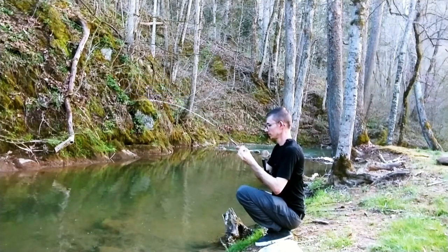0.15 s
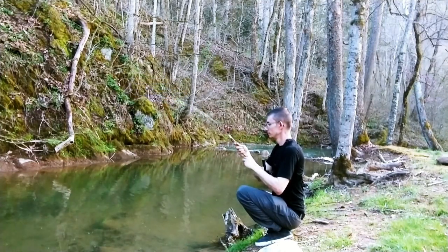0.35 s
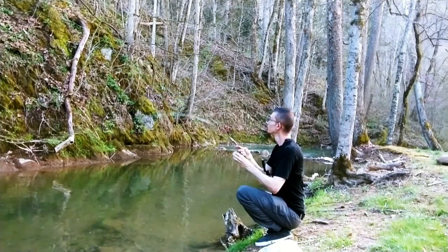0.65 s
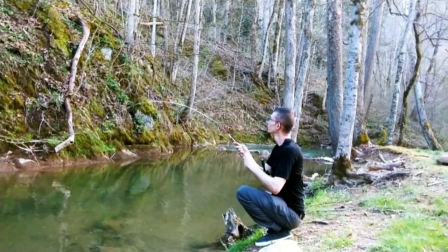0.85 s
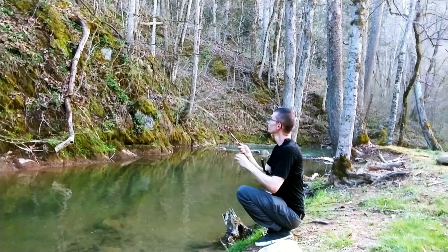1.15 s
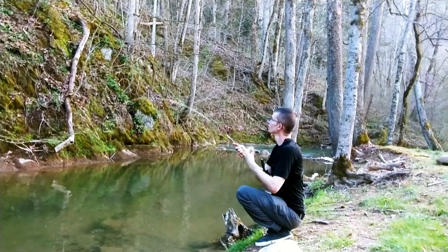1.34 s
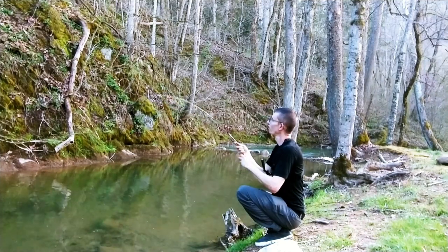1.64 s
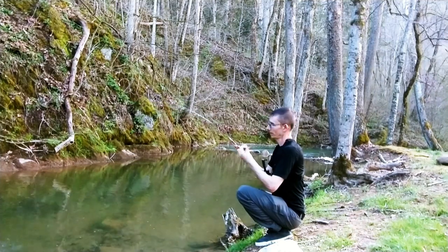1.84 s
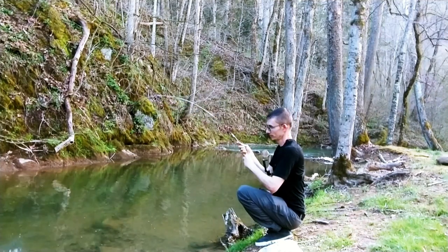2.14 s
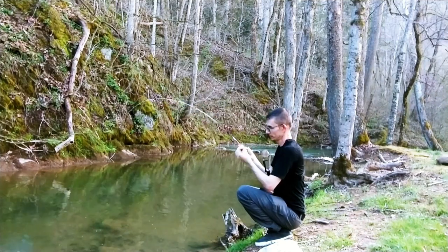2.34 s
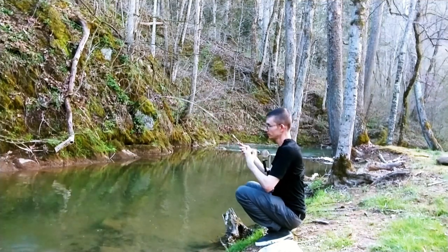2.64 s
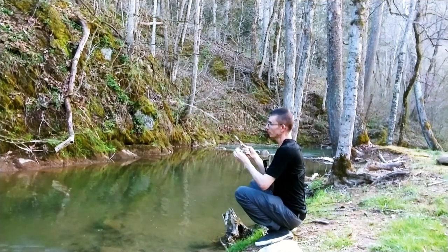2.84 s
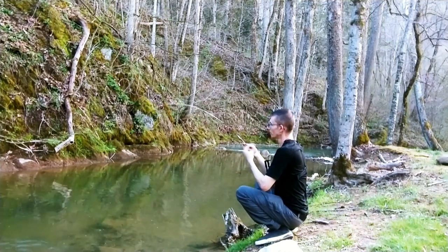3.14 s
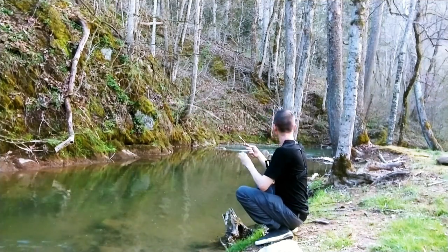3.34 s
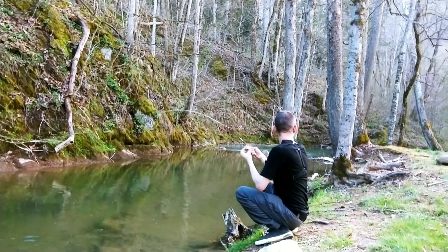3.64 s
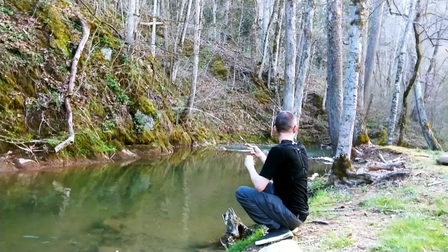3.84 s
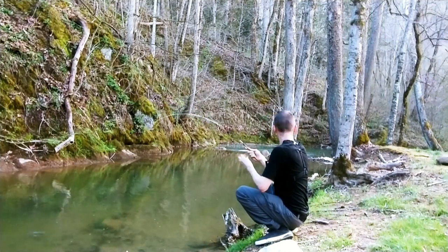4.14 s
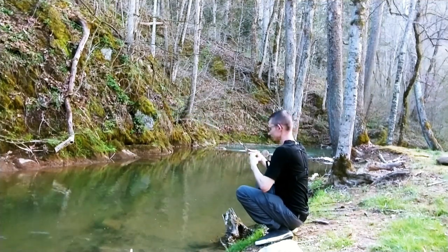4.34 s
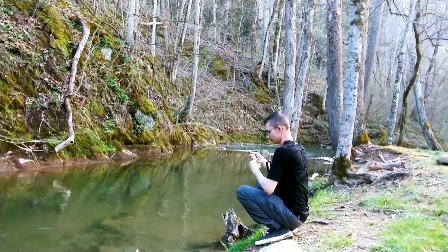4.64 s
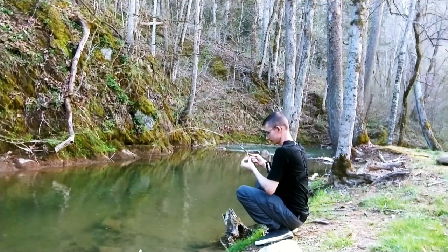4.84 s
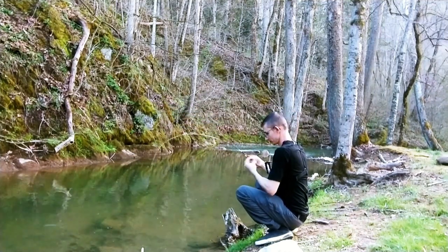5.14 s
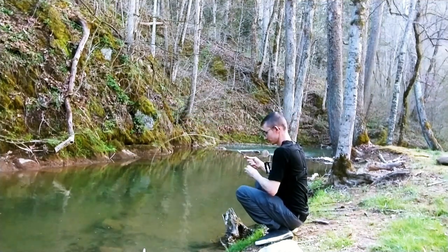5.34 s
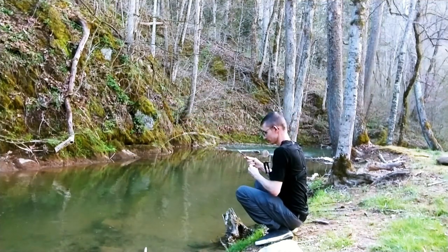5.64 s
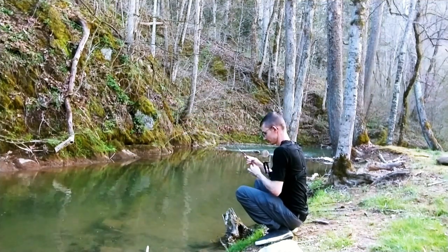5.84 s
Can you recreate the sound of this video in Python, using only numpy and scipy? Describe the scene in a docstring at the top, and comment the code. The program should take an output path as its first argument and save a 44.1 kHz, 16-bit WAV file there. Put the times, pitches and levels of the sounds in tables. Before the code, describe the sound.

Constant bubbling stream hiss outdoors, with soft low rumble and a far rotor-like fluttering beat growing louder and steadier.

```python
"""From the start a creek rushes over a stony riffle in a wooded valley: churned noise, ringing bubbles, brief splashes.
Light air rumbles underneath as low noise, and a low unsteady throb, most likely a far helicopter's rotor,
sounds as harmonics of a slowly sinking beat. Faint dry ticks, puffs of treble noise, come from 1.6 to 2 s.
The throb then grows louder and steadier to the end, with two thin gliding peeps, perhaps a bird, after 5 s.
"""
import sys
import numpy as np
from scipy import signal
from scipy.fft import rfft, irfft, next_fast_len
from scipy.io import wavfile
from scipy.ndimage import uniform_filter1d, map_coordinates

SR = 44100
rng = np.random.default_rng(int(sys.argv[2]) if len(sys.argv) > 2 else 0)


def unload_wav(signal):
    """Save mono or channel-first audio to the path in sys.argv[1] as 16-bit WAV at rate SR, clipped to [-1, 1]."""
    wavfile.write(
        sys.argv[1],
        SR,
        np.round(np.clip(np.atleast_2d(signal).T, -1, 1) * 32767).astype(np.int16),
    )


N = 263718
TIME_S = np.arange(N) / SR


def amp(db):
    """Decibels to gain."""
    return 10 ** (np.asarray(db) / 20)


def unit(x):
    """Scale to rms 1."""
    return x / np.sqrt(np.mean(np.abs(x) ** 2) + 1e-20)


def along(points, hz):
    """Join (frequency, value) points on a log frequency axis."""
    point_hz, value = np.transpose(points)
    return np.interp(np.log(hz + 1), np.log(point_hz + 1), value)


def curve(points):
    """Join (time, value) points into one value per sample."""
    point_s, value = np.transpose(points)
    return np.interp(TIME_S, point_s, value)


def wobble(knots_per_s):
    """Smooth random curve through normal random knots."""
    knots = rng.standard_normal(int(N * knots_per_s / SR) + 4)
    return map_coordinates(knots, [np.arange(N) * knots_per_s / SR])


def filtered(x, response):
    """Multiply the spectrum of x by a response of frequency."""
    m = next_fast_len(N + SR // 2)
    hz = np.fft.rfftfreq(m, 1 / SR)
    return irfft(rfft(x, m) * response(hz), m)[..., :N]


def band(centre_hz, octaves):
    """Stereo noise of rms 1 in a bell around a pitch."""
    noise = rng.standard_normal((2, N))
    return unit(filtered(noise, lambda hz: np.exp(-(np.log2((hz + 1) / centre_hz) / octaves) ** 2)))


def swell(centre_s, length_s):
    """Bell in time, down to 1/e at length_s either side."""
    return np.exp(-((TIME_S - centre_s) / length_s) ** 2)


def placed(x, lean_db):
    """Pan x so that left is louder than right by lean_db."""
    return x * amp([[lean_db / 2], [-lean_db / 2]])


# Spectral shape of the rush, middle and sides: (frequency [Hz], gain [dB])
WATER_MID_GAIN = [(100, 4), (230, 2.5), (305, 2), (370, 0.5), (450, 2.5), (720, -1.6), (1000, 0.5),
                  (1500, 0.5), (2100, -1.37), (3000, -7), (4100, -11), (4800, -11), (8400, -15),
                  (12200, -30)]
WATER_SIDE_GAIN = [(100, -9), (250, -8.5), (700, -8.5), (1000, -3), (1400, -5), (2100, -8.5), (3000, -11),
                   (4100, -14), (4800, -14.5), (8400, -15.5), (10500, -22.5), (12200, -35)]
# Stereo lean of the water: (frequency [Hz], left minus right [dB])
WATER_LEAN = [(200, 1), (450, 0.5), (700, -1), (1000, 0.5), (1400, 2.5), (2200, 0), (3700, -0.5), (4700, 4),
              (5600, -2.5), (6400, 3), (8200, -2.5), (11000, 0)]
FLOW_START_DB, FLOW_SINKS_DB_PER_S = -37.5, 0.245


def creek():
    """Churning water and its bubbles, spread wide by the banks; the rush slowly declines."""
    ringing = bubbles(count=4400, low_hz=399.4, high_hz=4976, cycles=17.0, rise=0.11, spread_db=1.0)
    water = unit(churn(patchy_db=1.0) + amp(-16) * ringing)
    mid, side = filtered(water, lambda hz: amp([along(WATER_MID_GAIN, hz), along(WATER_SIDE_GAIN, hz)]))
    pair = np.array([mid + side, mid - side])
    pair = filtered(pair, lambda hz: amp(along(WATER_LEAN, hz) * np.array([[0.5], [-0.5]])))
    flow_db = FLOW_START_DB - FLOW_SINKS_DB_PER_S * TIME_S
    return unit(pair) * amp(flow_db + 0.13 * wobble(knots_per_s=8.6))


def churn(patchy_db):
    """Turbulence: two white noises whose strength shifts in patches of time and pitch."""
    spectra = signal.stft(rng.standard_normal((2, N)), nperseg=512)[2]
    field = rng.standard_normal(spectra.shape)
    field = uniform_filter1d(field, size=5, axis=1)  # across pitch
    field = uniform_filter1d(field, size=8, axis=2)  # across time
    return unit(signal.istft(spectra * amp(patchy_db * unit(field)), nperseg=512)[1][:, :N])


def bubbles(count, low_hz, high_hz, cycles, rise, spread_db):
    """Bubbles ring, decaying over a set number of cycles, and rise in pitch as they near the surface."""
    when, pitch, size, side = rng.random((count, 4)).T[:, :, None]
    hz = low_hz * (high_hz / low_hz) ** pitch
    k = np.arange(SR // 40)
    age = k / SR * hz / cycles  # 1 after the set number of cycles
    tone = np.sin(2 * np.pi * cycles * age * (1 + rise * np.minimum(age, 2) / 2))
    ring = tone * np.exp(-2 * age) * (1 - np.exp(-20 * age))
    ring *= hz * amp(-spread_db * np.log(np.maximum(size, 0.01)))  # few are much louder than the rest
    at = ((when * N).astype(int) + k).ravel()
    turn = (side - 0.5) * np.pi
    mid_side_gains = (np.cos(turn), np.sin(turn))
    return unit(np.array([np.bincount(at, (ring * gain).ravel(), N)[:N] for gain in mid_side_gains]))


# Brief swells of the splashing: (time [s], level [dB], centre [Hz], length [s])
SPLASH_EVENTS = [(0.932, -46, 720, .025), (1.103, -49, 650, 0.016), (1.418, -43, 4000, 0.015),
                 (1.464, -42, 1400, 0.021), (1.61, -38, 1180, 0.024), (1.613, -45, 3500, 0.022),
                 (1.805, -41.5, 4000, 0.01), (1.917, -40.5, 1680, 0.017), (2.62, -44, 2200, .015),
                 (3.608, -48, 3200, 0.031), (3.68, -43, 650, 0.02), (4.054, -43, 1500, .018),
                 (4.765, -44, 1700, .025)]


def splashes():
    """Now and then the water slops a little louder: swells of octave-scale noise."""
    return sum(amp(level_db) * swell(start_s, length_s) * band(hz, octaves=1.0)
               for start_s, level_db, hz, length_s in SPLASH_EVENTS)


# Larger bubbles: (time [s], level before the +0.5 dB trim and the envelope [dB], pitch [Hz])
GURGLE_EVENTS = [(0.545, -37, 2660), (1.428, -36, 1800), (1.605, -34, 1030), (1.607, -37, 2310),
                 (1.659, -33, 940), (1.909, -34, 440), (2.029, -41, 2520), (2.436, -35, 1360),
                 (2.769, -35, 1190), (3.253, -34, 1540), (3.607, -38, 2980), (3.784, -39, 686),
                 (4.031, -35, 856), (4.049, -40, 2410)]


def gurgles(rise_s=0.0023, decay_60db_s=0.066, glide_per_s=2.07, trim_db=0.5):
    """Single bubbles ring briefly and rise in pitch, each at its own place in the riffle."""
    out = np.zeros((2, N + SR))
    t = np.arange(SR // 10) / SR
    envelope = (1 - np.exp(-t / rise_s)) * amp(-60 * t / decay_60db_s)
    for start_s, level_db, hz in GURGLE_EVENTS:
        tone = np.sin(2 * np.pi * hz * t * (1 + glide_per_s * t / 2))
        ring = amp(level_db + trim_db) * envelope * tone
        start = round(start_s * SR)
        out[:, start:start + len(t)] += placed(ring, lean_db=2 * rng.standard_normal())
    return out[:, :N]


# Blade passes, sinking with the Doppler shift: (time [s], beat [Hz])
BLADE_BEAT = [(0, 20.85), (1.8, 20.37), (3.3, 19.58), (3.9, 19.44), (4.25, 19.48), (4.6, 19.26),
              (5.1, 19.15), (5.98, 19.15)]
# Mean level of the two strongest partials; also drives boom and steadiness: (time [s], level [dB])
THROB_LEVEL = [(0, -39), (0.45, -40.5), (0.68, -50), (0.88, -36.5), (1.08, -45.5), (1.42, -34),
               (1.68, -39.5), (1.88, -35.5), (2.15, -40), (2.33, -40.5), (2.44, -44), (2.48, -33.5),
               (2.9, -28.5), (3.08, -29.5), (3.18, -44), (3.24, -30.5), (3.55, -31), (4.15, -28.5),
               (4.26, -32), (4.33, -27), (4.92, -26.5), (5.28, -22), (5.55, -24), (5.98, -23.5)]
# Balance of the two strongest partials: (time [s], upper minus lower [dB])
THROB_TILT = [(0.1, 7), (0.7, -9), (1.4, 2), (1.68, -18), (2.1, -1), (2.48, 9), (2.6, 1.5), (3.05, 9.5),
              (3.3, -5.5), (3.85, 2), (4.4, 0.5), (5.05, 5), (5.65, -1)]
# Weak low partials: (multiple of the beat, level relative to the boom [dB])
BOOM_PARTIALS = [(2, -8), (3, 2)]
# Partials of the blade slap: (multiple of the beat, level relative to the slap [dB])
SLAP_PARTIALS = [(6, -4.5), (7, 2), (8, -23), (10, -23), (11, -14), (12, -22.5)]
# Blade slap, which sharpens as the rotor nears: (time [s], level [dB])
SLAP_CURVE = [(0, -59), (1.6, -52.5), (2.45, -47.5), (3.0, -54), (3.3, -45.5), (5.08, -47.5), (5.28, -39.5),
              (5.98, -36.5)]
# Hum on the ninth multiple of the beat, which comes and goes: (time [s], level [dB])
HUM_CURVE = [(0, -55), (.37, -45.5), (.65, -51.5), (1.5, -60), (1.95, -48.5), (2.25, -54), (2.58, -49),
             (2.9, -47), (3.15, -61), (3.55, -48), (3.92, -47), (4.07, -52), (4.3, -48), (5.5, -50),
             (5.98, -43.5)]
MIDWAY_DB = -36.5  # rotor loudness halfway through its approach
BOOM_MIDWAY_DB, BOOM_DB_PER_DB = -45, 0.31  # the longest waves fade least
SCATTER_MIDWAY_DB, SCATTER_LOSS_DB_PER_DB = -18, 2.6  # slope-scattered over direct sound
FADE_DB, FADE_KNOTS_PER_S = 1.4, 4.9  # each weak partial fades by itself
DISPERSION_RAD = 1.4  # how far the path spreads each thump


def rotor():
    """Each blade pass is one soft thump, a sum of partials that flutter less the louder the rotor is."""
    level_db, tilt_db, slap_db = curve(THROB_LEVEL), curve(THROB_TILT), curve(SLAP_CURVE)
    near_db = level_db - MIDWAY_DB
    phase = 2 * np.pi * np.cumsum(curve(BLADE_BEAT)) / SR
    scattered = 1 / (1 + amp(SCATTER_LOSS_DB_PER_DB * near_db - SCATTER_MIDWAY_DB) ** 2)  # power share

    lower_db = level_db - 10 * np.log10((1 + amp(tilt_db) ** 2) / 2)  # the two strongest split the power
    boom_db = BOOM_MIDWAY_DB + BOOM_DB_PER_DB * near_db
    weak = [(k, boom_db + db) for k, db in BOOM_PARTIALS]
    weak += [(k, slap_db + db) for k, db in SLAP_PARTIALS]
    partials = [(4, lower_db), (5, lower_db + tilt_db), (9, curve(HUM_CURVE))]
    partials += [(k, db + FADE_DB * wobble(FADE_KNOTS_PER_S)) for k, db in weak]

    throb = np.zeros(N)
    for k, db in partials:
        flutter = unit(wobble(8.3) + 1j * wobble(8.2))
        path = np.sqrt(1 - scattered) + np.sqrt(scattered) * flutter
        smear = DISPERSION_RAD * (4.5 * np.log(k / 4.5)) ** 2  # higher partials arrive later, rounding the thump
        throb += amp(db + 3) * np.real(path * np.exp(1j * (k * phase - smear)))  # +3 dB: rms to peak
    return placed(throb, lean_db=1.0)


# Dry ticks: (time [s], level before the +6 dB trim [dB], pitch [Hz])
TICK_EVENTS = [(1.618, -51, 8200), (1.627, -50, 7950), (1.643, -47, 8100), (1.65, -46, 7700),
               (1.824, -46.5, 8900), (1.858, -51, 9400), (1.916, -42, 8340), (1.924, -48, 8600),
               (1.948, -48, 6800), (1.984, -42, 8400), (1.996, -48, 9000)]


def ticks(decay_60db_s=0.014, trim_db=6.0):
    """Tiny dry snaps: puffs of narrow treble noise that start abruptly and die at once."""
    out = np.zeros((2, N))
    for start_s, level_db, hz in TICK_EVENTS:
        decay = (TIME_S >= start_s) * amp(-60 * np.abs(TIME_S - start_s) / decay_60db_s)
        out += amp(level_db + trim_db) * decay * band(hz, octaves=0.28)
    return out


# Thin peeps, perhaps of a far bird: (time [s], level [dB], pitch [Hz], length [s])
PEEP_EVENTS = [(5.16, -51.5, 3000, 0.05), (5.795, -53, 5480, .048)]


def peeps(fall_per_s=0.098):
    """Short whistles: swelling sines whose pitch sags by twice fall_per_s, as a fraction."""
    out = np.zeros(N)
    for centre_s, level_db, hz, length_s in PEEP_EVENTS:
        t = TIME_S - centre_s
        out += amp(level_db) * swell(centre_s, length_s) * np.sin(2 * np.pi * hz * t * (1 - fall_per_s * t))
    return out


# Spectral shape of the air's low rumble: (frequency [Hz], gain [dB])
AIR_GAIN = [(15, -32), (26, -17), (36, 0.5), (55, -8.5), (90, 9), (125, -2.5), (170, -9), (260, -28),
            (500, -43)]
AIR_START_DB, AIR_RISES_DB_PER_S = -39.5, 0.5


def air():
    """Low noise, alike on both sides, that comes in soft lumps and slowly grows."""
    rumble = filtered(rng.standard_normal(N), lambda hz: amp(along(AIR_GAIN, hz)) * (hz < 600))
    level_db = AIR_START_DB + AIR_RISES_DB_PER_S * TIME_S
    return unit(rumble) * amp(level_db + 1.4 * wobble(knots_per_s=10))


def scene():
    """Sum of the water, the far rotor, the small sounds and the air."""
    return creek() + splashes() + gurgles() + rotor() + ticks() + peeps() + air()


# Treble response of both microphones: (frequency [Hz], gain [dB])
MIC_GAIN = [(5100, 0.5), (5500, -3.5), (5900, -10.5), (6400, -14.5), (7200, -11), (8500, -9.5)]


def record(dry, left_cut_hz=92, top_hz=12280):
    """First-order bass cut in the left microphone; both dull the treble and stop at top_hz."""
    left = filtered(dry[0], lambda hz: 1j * hz / (1j * hz + left_cut_hz))
    return filtered(np.array([left, dry[1]]), lambda hz: amp(along(MIC_GAIN, hz)) * (hz < top_hz))


dry = scene()
out = record(dry)
unload_wav(out)
```